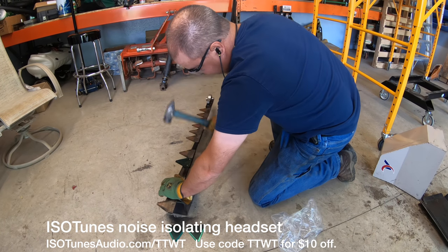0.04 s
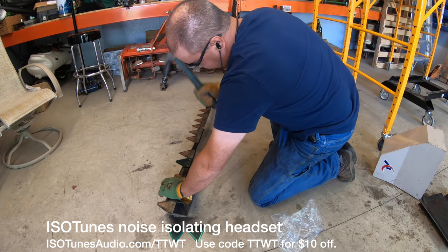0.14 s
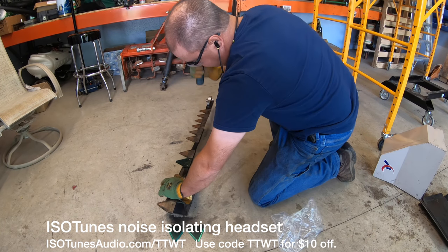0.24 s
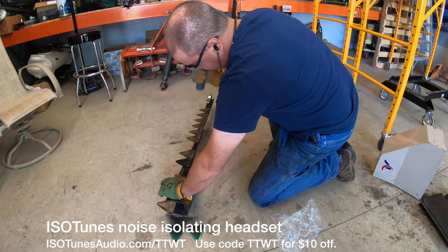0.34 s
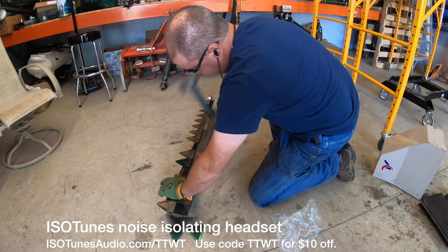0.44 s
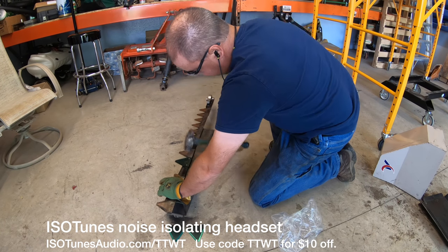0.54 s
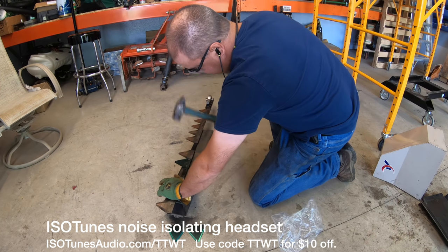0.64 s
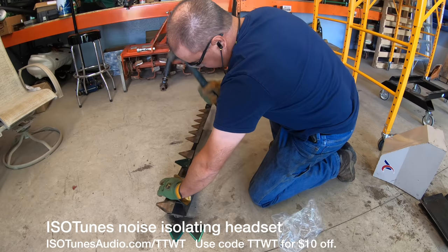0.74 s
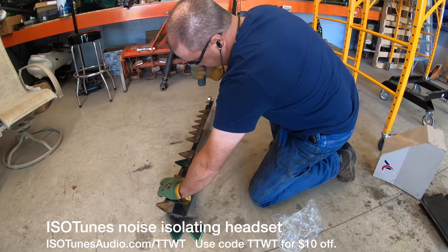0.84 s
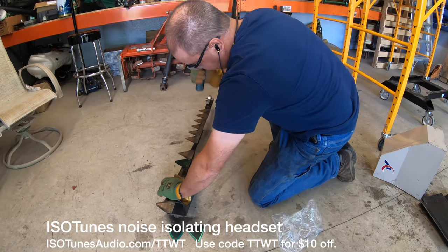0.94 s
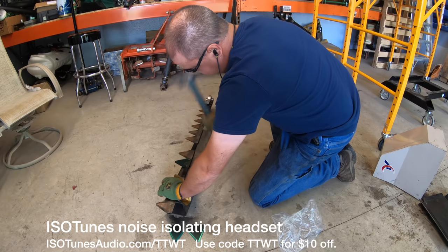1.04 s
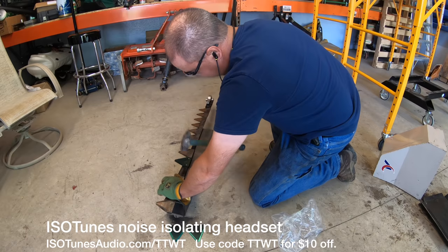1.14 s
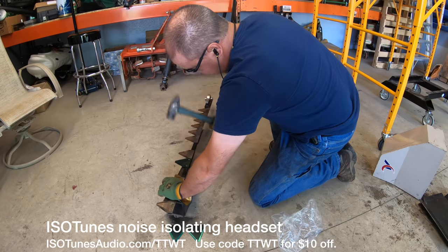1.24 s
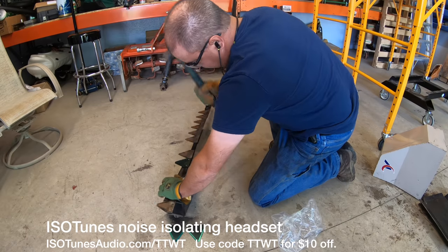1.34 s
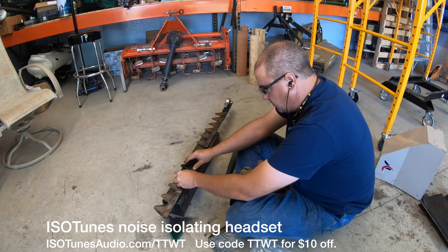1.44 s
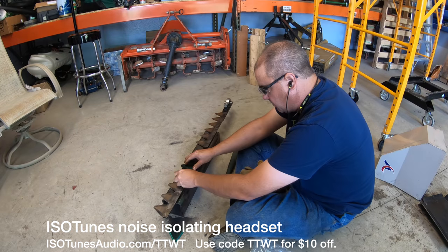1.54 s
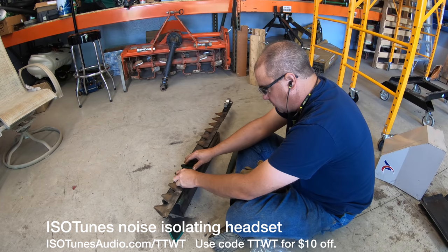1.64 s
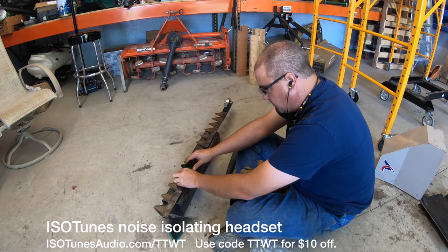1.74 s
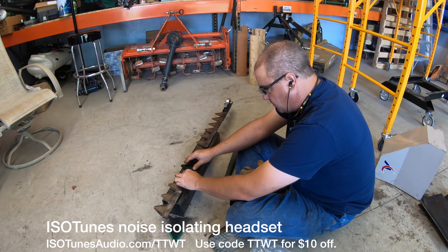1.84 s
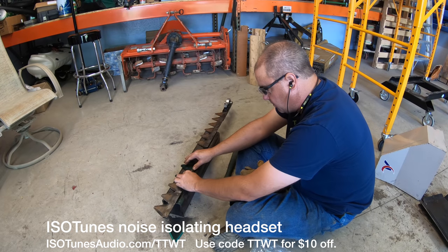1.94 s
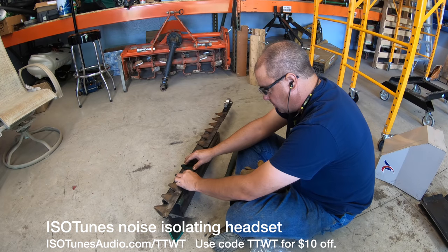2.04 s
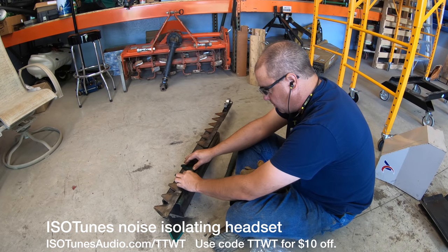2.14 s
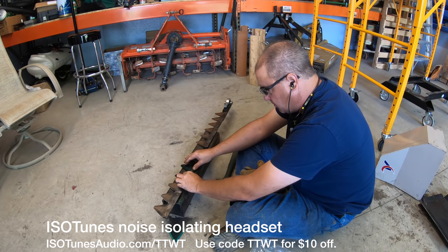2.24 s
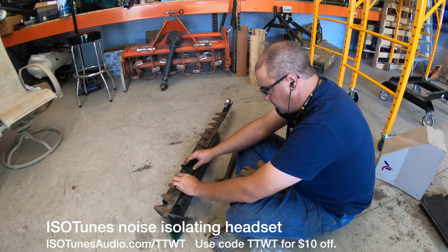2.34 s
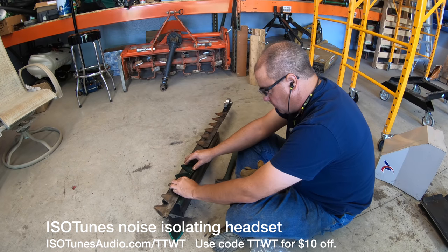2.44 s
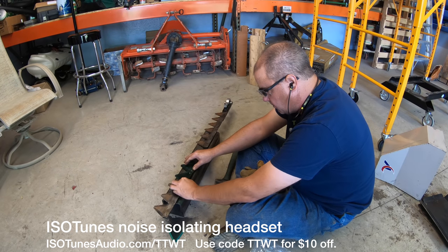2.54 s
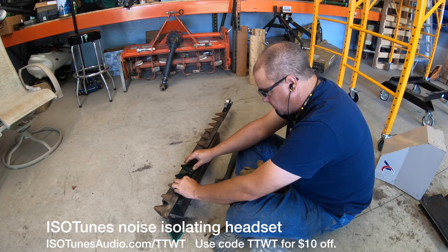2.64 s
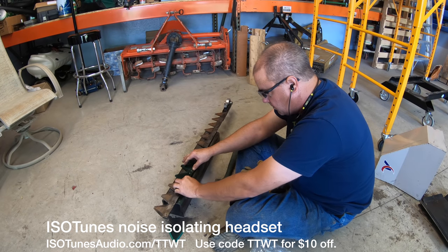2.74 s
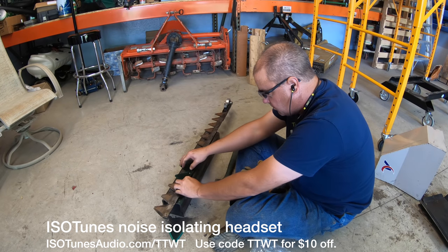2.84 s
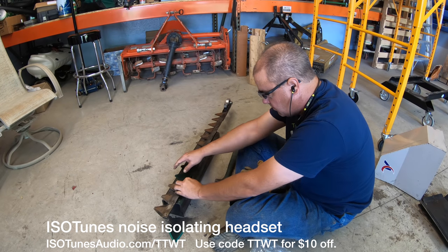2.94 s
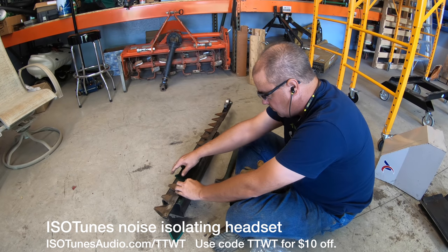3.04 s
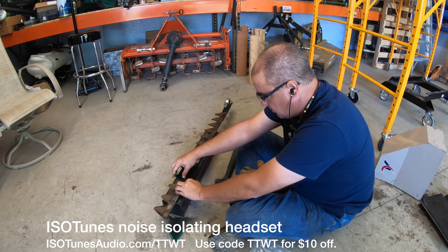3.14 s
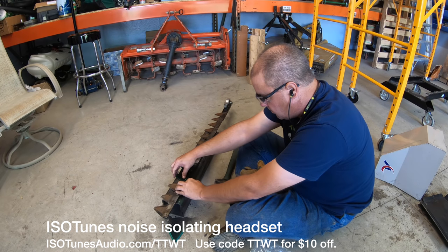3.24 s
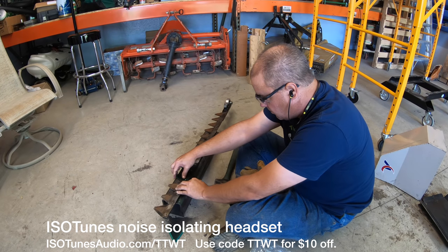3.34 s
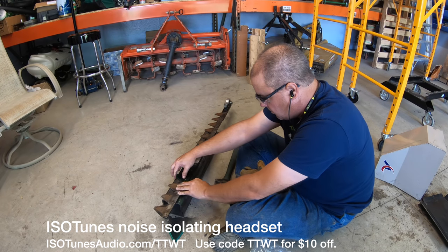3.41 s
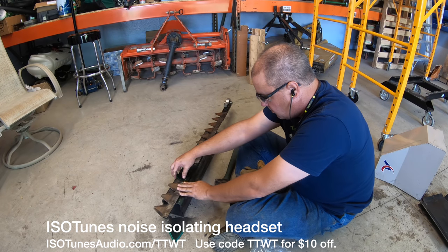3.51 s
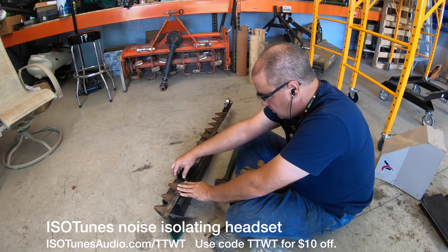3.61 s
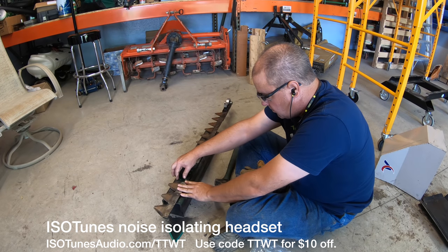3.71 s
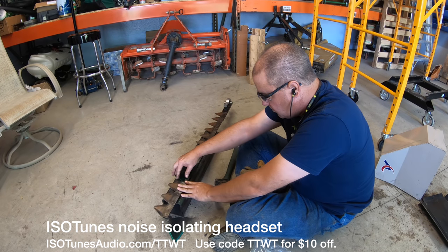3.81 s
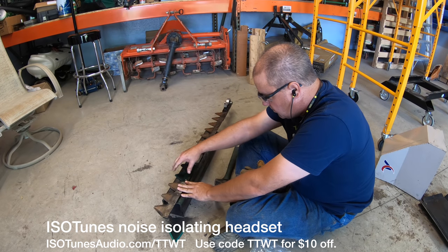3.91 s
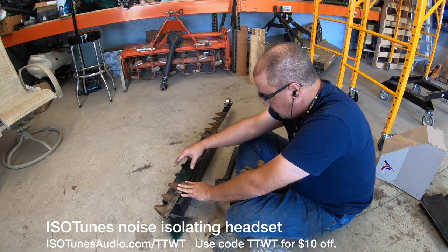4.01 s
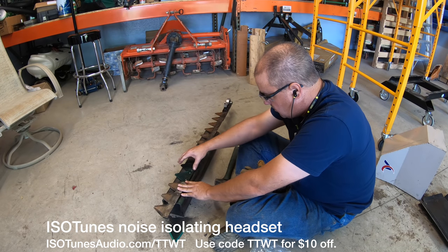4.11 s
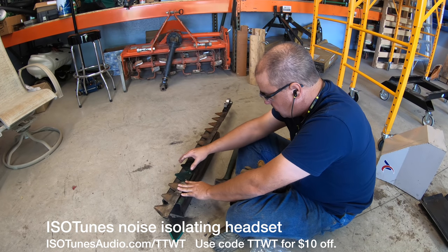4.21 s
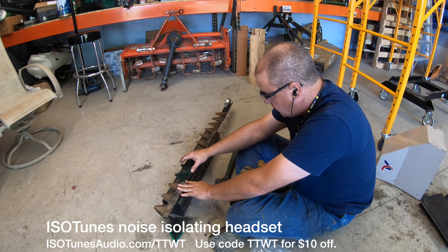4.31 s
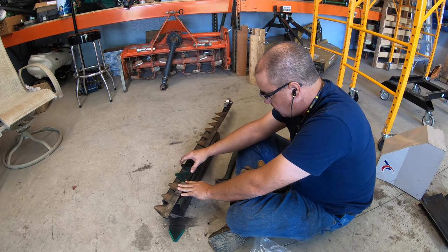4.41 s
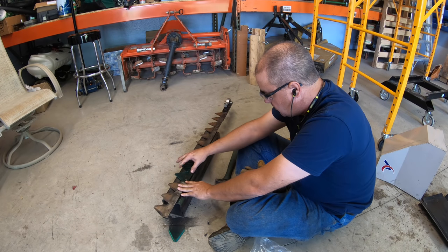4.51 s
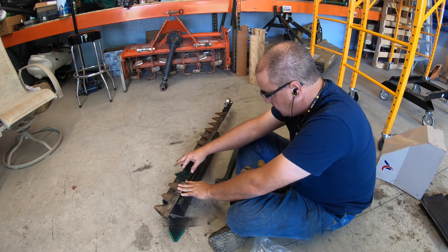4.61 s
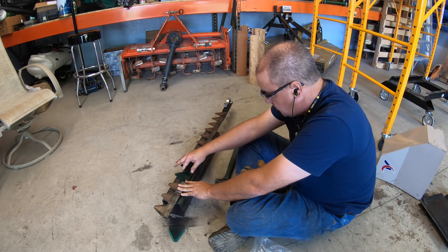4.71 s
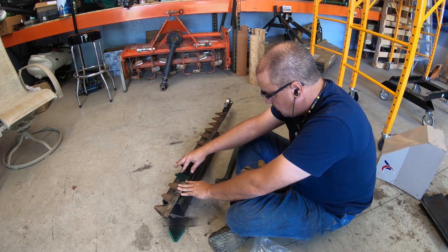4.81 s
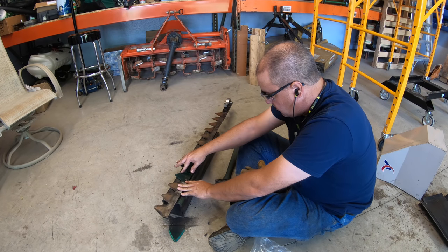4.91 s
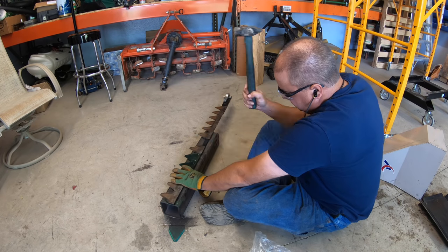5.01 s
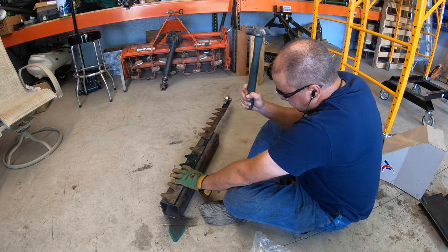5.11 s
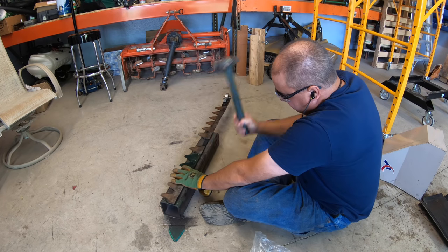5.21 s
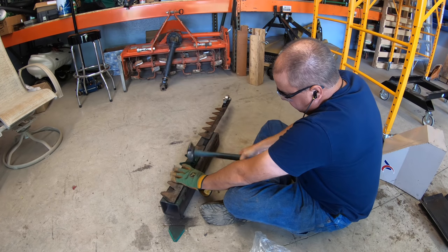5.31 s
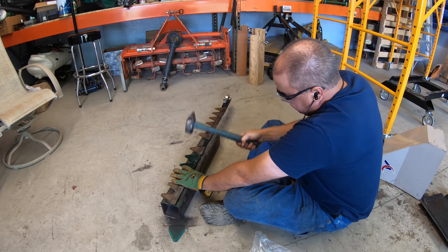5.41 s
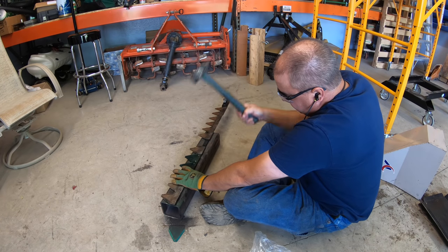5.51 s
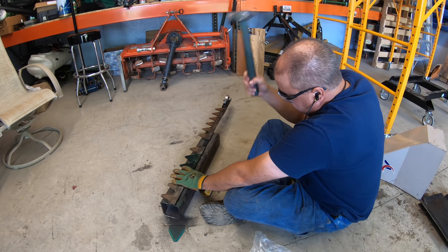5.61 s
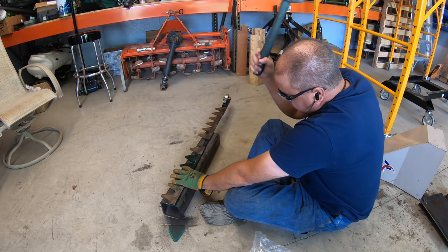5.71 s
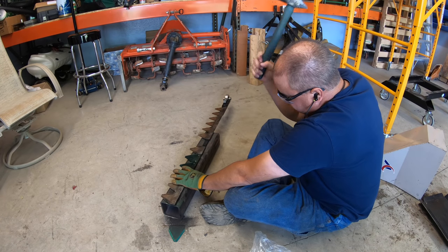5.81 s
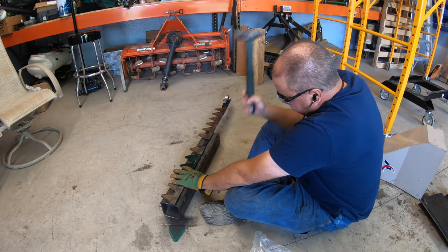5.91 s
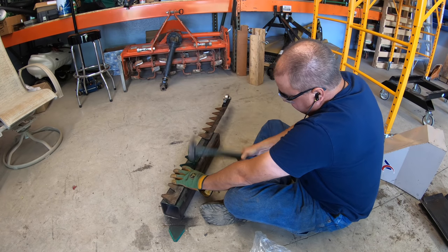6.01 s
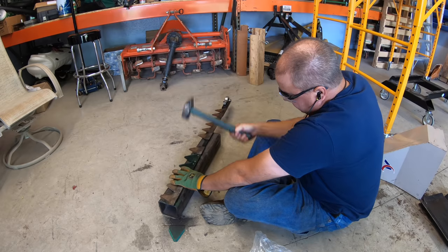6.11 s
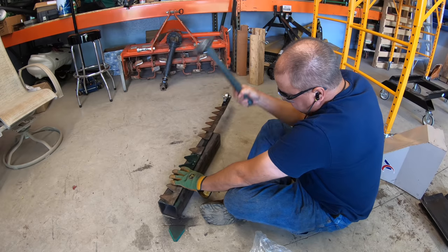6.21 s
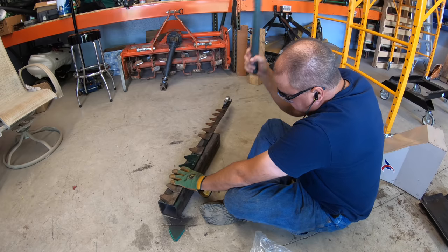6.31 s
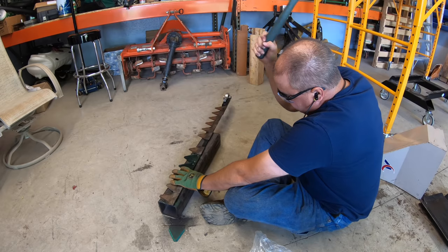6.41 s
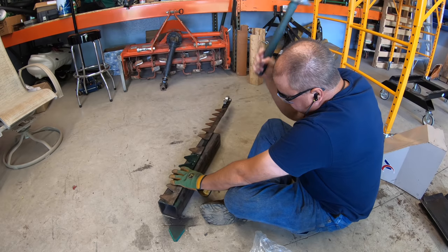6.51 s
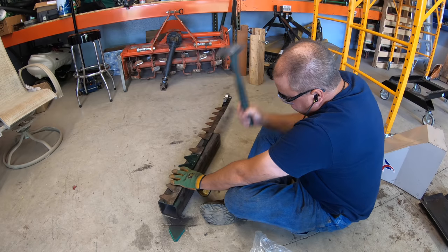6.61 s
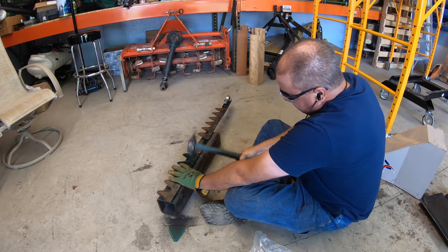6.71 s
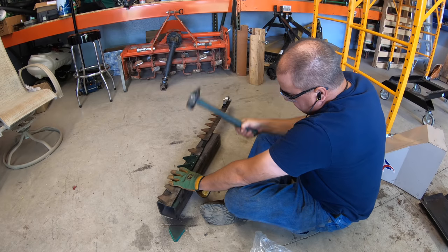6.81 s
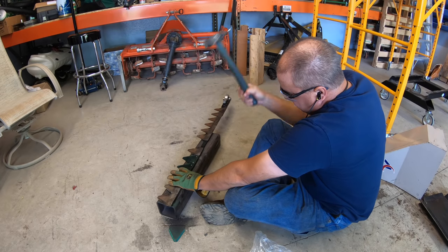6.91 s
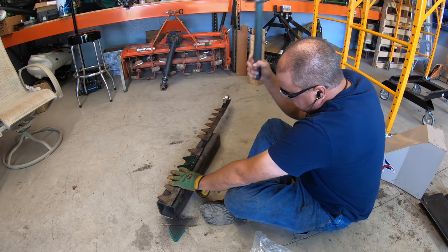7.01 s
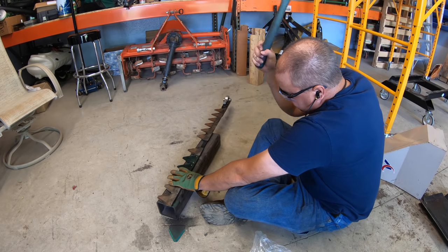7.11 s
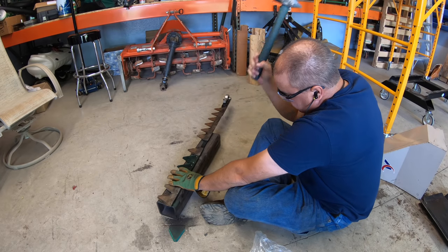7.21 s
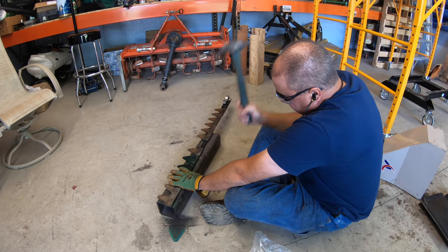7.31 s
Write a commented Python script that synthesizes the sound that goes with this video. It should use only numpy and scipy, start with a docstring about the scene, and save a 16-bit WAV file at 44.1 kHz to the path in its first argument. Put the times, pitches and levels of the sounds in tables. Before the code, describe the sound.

Heavy hammering on steel opens abruptly, each blow clanging with a shimmering inharmonic tail of about half a second and a dull thud beneath. The level drops and the hammering stops; loose metal sections clink and scrape in a brief cluster, then a few tiny taps. Hammering returns slightly slower, with dull ticks between hits. Faint workshop air noise, mostly centered pickup, loud peaks compressed and briefly ducked.

```python
"""Riveting a steel mower knife

A hammer drives rivets into a knife bar lying on a beam in a large concrete workshop: ringing modes, noisy clatter,
low thud. Between two rounds, loose knife sections clink on the bar as groups of modes with scrapes and knocks.
Dull ticks are scrape, knock and one short tone. Background noise is duller in the hammering rounds, brighter between.
The level dips to silence at heavy blows and at two other moments, then comes back; a gain control tames loud sound."""
import sys
import numpy as np
from scipy import signal
from scipy.fft import rfft, irfft, next_fast_len
from scipy.io import wavfile
from scipy.ndimage import uniform_filter1d

SR = 44100
rng = np.random.default_rng(int(sys.argv[2]) if len(sys.argv) > 2 else 0)


def wav_record(signal):
    """Record a signal, one row per channel, as 16-bit PCM in the file named by sys.argv[1]."""
    frames = np.transpose(np.atleast_2d(signal))
    bounded = np.clip(frames, -1, 1)
    # unit amplitude maps onto the largest positive 16-bit level
    quanta = np.round(bounded * 32767).astype(np.int16)
    wavfile.write(sys.argv[1], SR, quanta)


N = 324135  # length [samples]
LEAD = SR // 10  # room for a blow that strikes just before the start [samples]
SPAN = np.arange(SR) / SR  # clock of one sound [s]


def amp(db):
    """Turns decibels into a plain multiplier."""
    return 10 ** (np.asarray(db) / 20)


def along(points, hz):
    """Reads a curve of (frequency [Hz], value) points on a log frequency axis."""
    f, v = np.transpose(points)
    return np.interp(np.log(hz + 1), np.log(f + 1), v)


def filtered(x, response):
    """Multiplies the spectrum of x by a response that depends on frequency."""
    m = next_fast_len(x.shape[-1] + SR // 4)
    spectrum = rfft(x, m) * response(np.fft.rfftfreq(m, 1 / SR))
    return irfft(spectrum, m)[..., :x.shape[-1]]


def octaves(hz):
    """Distance from about 2 kHz in octaves; the added 20 Hz keeps the bottom finite."""
    return np.log2((hz + 20) / 2000)


def burst(spectrum, decays, tilt_db=0, spiky_db=0):
    """One second of noise starting near rms 1, each frequency dying at its own speed.
    Spiky noise crowds into many small modes."""
    hz, t, z = signal.stft(rng.standard_normal(SR), SR, nperseg=512)
    colour = amp(along(spectrum, hz) + tilt_db * octaves(hz))
    colour = colour / np.sqrt(np.mean(colour ** 2))
    fading = amp(-60 * t / along(decays, hz)[:, None])
    noise = signal.istft(z * fading * colour[:, None], SR, nperseg=512)[1][:SR]
    grid = np.arange(0, SR / 2, 45)
    lines = amp(spiky_db * np.clip(grid / 2500, 0, 1) * rng.standard_normal(len(grid)))
    lines = lines / np.sqrt(np.mean(lines ** 2))
    return filtered(noise, lambda f: np.interp(f, grid, lines))


def ringing(hz, db, t60, scatter_db, waver, waver_hz, tail_db):
    """Modes at new strengths; loose contacts and room echoes make each one waver in size and phase."""
    level, phase = rng.standard_normal((2, len(hz), 1))
    # random points, waver_hz of them each second, joined by straight lines
    knots = rng.standard_normal((2, len(hz), 200))
    place = np.minimum(SPAN * waver_hz, 198)
    left = place.astype(int)
    wander = knots[..., left] * (1 + left - place) + knots[..., left + 1] * (place - left)
    in_step, out_of_step = waver * np.minimum(0.48 + SPAN / 0.036, 1) * wander
    angle = 2 * np.pi * (hz[:, None] * SPAN + phase)
    # a quick first fall, then a faint slower tail, weaker in the treble
    fall_db = 60 * SPAN / t60[:, None]
    fade = amp(-1.12 * fall_db) + amp(tail_db - 3 * octaves(hz)[:, None] - 0.5 * fall_db)
    size = amp(db[:, None] + scatter_db * level) * fade
    return np.sum(size * ((1 + in_step) * np.sin(angle) + out_of_step * np.cos(angle)), axis=0)


def add(track, s, sound):
    """Mixes a sound in at s seconds."""
    track[LEAD + round(s * SR):][:SR] += sound


# Heavy blows: (time [s], ring level [dB], clatter level [dB], thud level [dB])
BLOWS = [(-.035, -3.5, -11, -16.5), (.547, -1.5, -10, -20), (1.154, -2.5, -10, -17.5),
         (4.662, -10.5, -5.5, -24.5), (5.354, -4, -12.5, -23), (6.071, -3, -10, -21.5),
         (6.746, -4.5, -8, -18)]
# Modes of the struck steel, levels before each blow's ring level is added:
# (frequency [Hz], first-round level [dB], second-round level [dB], nominal decay time to -60 dB [s])
BEAM_MODES = [(912, -40, -35, 0.63), (1034, -24, -19, 0.63), (1445, -18, -16, 0.67), (1488, -24, -24, 0.63),
              (1523, -19, -20, 0.58), (1550, -16, -17, 0.61), (1588, -28, -20, 0.82),
              (1612, -29, -26, 0.76), (1677, -14, -14, 0.58), (1725, -24, -23, 0.64),
              (1752, -25, -28, 0.67), (1828, -23, -26, 0.66), (1857, -19, -29, 0.72),
              (2094, -18, -19, 0.56), (2129, -31, -23, 0.55), (2323, -32, -30, 0.63),
              (2409, -23, -29, 0.74), (2449, -29, -33, 0.79), (2506, -21, -20, 0.64),
              (2538, -32, -35, 0.84), (2616, -30, -23, 0.58), (2789, -25, -17, 0.48),
              (2939, -25, -20, 0.58), (3211, -28, -29, 0.55), (3262, -15, -16, 0.54),
              (3305, -23, -18, 0.56), (3338, -32, -29, 0.62), (3496, -29, -23, 0.62),
              (3615, -27, -19, 0.61), (3758, -18, -29, 0.53)]
# Modes of the knife, same columns:
# (frequency [Hz], first-round level [dB], second-round level [dB], nominal decay time to -60 dB [s])
KNIFE_MODES = [(4013, -30, -21, 0.6), (4137, -29, -33, 0.64), (4164, -28, -32, 0.57),
               (4277, -33, -28, 0.69), (4307, -29, -28, 0.67), (4358, -28, -26, 0.58),
               (4430, -28, -24, 0.6), (4471, -25, -24, 0.59), (4565, -23, -30, 0.56),
               (4611, -34, -34, 0.66), (4867, -28, -34, 0.56), (4990, -22, -26, 0.57),
               (5020, -28, -24, 0.52), (5044, -29, -32, 0.52), (5179, -36, -34, 0.6),
               (5550, -35, -36, 0.62), (5580, -34, -33, 0.59), (5626, -34, -32, 0.76),
               (5696, -32, -33, 0.63), (5822, -31, -26, 0.53), (5986, -32, -37, 0.58),
               (6037, -32, -37, 0.55), (6471, -27, -30, 0.54), (6511, -37, -35, 0.66),
               (7047, -33, -40, 0.63), (7768, -29, -32, 0.5), (9475, -49, -38, 0.59),
               (9940, -41, -47, 0.57), (11108, -38, -42, 0.47), (12088, -33, -43, 0.5)]
# More high modes of the struck steel, same columns:
# (frequency [Hz], first-round level [dB], second-round level [dB], nominal decay time to -60 dB [s])
HIGH_MODES = [(7000, -36.5, -32, 0.57), (8070, -23, -21, 0.46), (8740, -33, -40.5, 0.86),
              (8500, -30.5, -21.5, 0.5), (10540, -26, -30.5, .35), (12000, -47, -53.5, 1),
              (12400, -43.5, -39, 0.4), (13350, -42, -41, .35), (14600, -42, -72, .4)]
# Colour of the rattling knife: (frequency [Hz], relative level [dB per Hz])
CLATTER = [(150, -43), (250, -7.5), (607, -9), (938, -9), (1020, -13.5), (1330, -14), (1500, -7),
           (2200, -11.5), (2440, -10.5), (3060, -9.5), (3340, -9.5), (5440, -12), (8550, -11.5),
           (16000, -25.5)]
# How long the rattle lasts: (frequency [Hz], decay time to -60 dB [s])
CLATTER_T60 = [(250, 0.5), (740, 0.4), (1600, 0.85), (3000, 0.72), (6000, 0.5), (10000, 0.34), (15000, 0.3)]
# Colour of the shaken floor slab: (frequency [Hz], relative level [dB per Hz])
THUD = [(15, -60), (25, -21), (80, -12), (183, 5.5), (208, -1), (254, -3), (335, -14), (500, -7),
        (650, -34.5), (1100, -120)]


def hammer():
    """Each blow rings the bar, rattles the knife and shakes the slab, whose thud swells and then drops away."""
    track = np.zeros(LEAD + N + SR)
    swell = np.exp(-((SPAN - .055) / .055) ** 2) + amp(-22.5 - 60 * SPAN / .5)
    hz, first_db, second_db, t60 = np.transpose(BEAM_MODES + KNIFE_MODES + HIGH_MODES)
    (pause, *_), (resume, *_) = DIPS
    for s, ring_db, clatter_db, thud_db in BLOWS:
        strengths = ring_db + (first_db if s < pause else second_db)
        ring = ringing(hz, strengths, t60, scatter_db=2, waver=1.1, waver_hz=38, tail_db=-20)
        clatter = amp(clatter_db) * burst(CLATTER, CLATTER_T60, spiky_db=4)
        thud = amp(thud_db) * swell * burst(THUD, [(30, 1.6), (300, 2.5)])
        # no hammering is heard between the two long dips
        heard = (s + SPAN < pause) | (s + SPAN > resume)
        add(track, s, (ring + clatter + thud) * heard)
    return track[LEAD:LEAD + N]


# Colour of the workshop's background noise: (frequency [Hz], relative level [dB per Hz])
HALL = [(18, -58.5), (30, -29.5), (98, -8.5), (161, -8), (221, -2), (404, -6.5), (1130, -7), (1280, -10.5),
        (1390, -5), (2010, -14), (6900, -16.5), (12600, -25.5), (16000, -24.5)]
# Background noise level and brightness over time, duller in the hammering rounds, brighter between:
# (time [s], nominal level [dB], tilt that sets the blend [dB per octave])
BACKGROUND = [(0, -53.5, -6.5), (1.5, -54.5, -3), (1.552, -53, -1.5), (2.7, -56.5, 0.5), (3.5, -54, -1),
              (4, -61, -1), (5.088, -60, 1), (5.11, -56.5, -14), (7.35, -50.5, -6)]


def hall():
    """Workshop air noise whose level and colour change over time, duller during the hammering.
    It blends a bright version with a dull one short of treble and deep bass."""
    s, level_db, tilt_db = np.transpose(BACKGROUND)
    t = np.arange(N) / SR
    noise = rng.standard_normal(N)

    def coloured(tilt):
        """Tilts the noise above about 1 kHz and shifts everything below 90 Hz."""
        return filtered(noise, lambda hz: amp(
            along(HALL, hz) + tilt * (np.maximum(octaves(hz) + 1, 0) + 3 * (hz < 90))))

    flat, bright, dull = coloured(0), coloured(2), coloured(-4)
    share = np.clip((np.interp(t, s, tilt_db) + 4) / 6, 0, 1) ** 2
    blend = share * bright + (1 - share) * dull
    return amp(np.interp(t, s, level_db)) * blend / np.std(flat)


# Colour of steel scraping steel: (frequency [Hz], relative level [dB per Hz])
SCRAPE = [(200, -72), (700, -18), (1400, 4), (2500, 7.5), (4500, 0.5), (7000, -4), (11000, -16.5),
          (16000, -26)]
# How long a scrape lasts: (frequency [Hz], decay time to -60 dB [s])
SCRAPE_T60 = [(1000, 0.38), (3000, 0.6), (8000, 0.5), (15000, 0.39)]
# Colour of the knocked hollow beam: (frequency [Hz], relative level [dB per Hz])
KNOCK = [(40, -89.5), (110, -28.5), (180, -17), (290, -0.5), (500, -9), (1000, -24), (2000, -74.5)]


def contact(scrape_db, tilt_db, knock_db):
    """Steel scraping steel, sharpest at first touch, over a knock of the beam."""
    click = 1 + 2.7 * amp(-60 * SPAN / 0.033)
    scrape = amp(scrape_db) * click * burst(SCRAPE, SCRAPE_T60, tilt_db, spiky_db=7)
    knock = amp(knock_db) * burst(KNOCK, [(300, 0.46)])
    return scrape + knock


# Dull ticks and scuffs of tool or rivet on the bar: (time [s], scrape level [dB],
# scrape tilt [dB per octave], knock level [dB], rivet ring level [dB], rise time [s])
TICKS = [(0.415, -35, -5, -49.5, -55, .006), (1.575, -48.5, -13, -53, -74, 0.0057),
         (5.11, -64.5, -4, -47.5, -78, 0.065), (5.284, -48, -11.5, -51.5, -45, 0.0012),
         (6.688, -39, -6.5, -46, -41, 0.0019), (7.293, -44.5, -8.5, -57, -42.5, .0008)]


def ticks():
    """A tool or rivet touches the bar: scrape and knock with one short tone of the rivet."""
    track = np.zeros(LEAD + N + SR)
    rivet_hz, rivet_t60 = 2860, .05  # [Hz], [s]
    for s, *touch, rivet_db, rise in TICKS:
        rivet = amp(rivet_db - 60 * SPAN / rivet_t60) * np.sin(2 * np.pi * rivet_hz * SPAN)
        onset = np.minimum(SPAN / rise, 1)
        add(track, s, onset * (contact(*touch) + rivet))
    return track[LEAD:LEAD + N]


# Section clinks: (time [s], way of touching [name], ring level [dB], overtone boost [dB], scrape level [dB],
# hardness as scrape tilt [dB per octave], knock level [dB], rise time [s])
TAPS = [(1.594, "edge", -43, 1, -58, -2.5, -69, 0.0013), (1.679, "flat", -27, -1, -20.5, 5.5, -63.5, 0.031),
        (1.722, "flat", -23, -3, -25, 3, -45.5, 0.0067), (1.873, "edge", -20.5, -5, -28, 4.5, -43, 0.0011),
        (1.903, "flat", -24, -0.5, -21, -0.24, -42, 0.011),
        (2.281, "edge", -41.5, -5, -62, -5, -67, 0.0013),
        (2.304, "edge", -8.5, -10.5, -39.5, 2, -53.5, .021),
        (2.322, "edge", -25, -3, -38.5, -2.1, -55, 0.00104),
        (2.991, "corner", -35, -7, -35, 2.2, -39.5, 0.00057),
        (3.017, "corner", -44, 5.5, -32.5, -1.5, -43.5, 0.0031),
        (3.309, "tip", -39, -0.5, -52.5, -0.5, -59, 0.0016),
        (3.641, "tip", -40.5, -24, -56, -2.4, -60, 0.0018)]
# Modes of a loose knife section: (frequency [Hz], relative level [dB], nominal decay time to -60 dB [s])
SECTION = [(1077, -19, .4), (1549, -4, .3), (1653, 0, .32), (1954, -5, .25), (2138, -6, .25),
           (2310, -13, .28), (2412, 0, .37), (2480, -2, .45), (2530, 0, .36), (2630, 0, .3),
           (2855, -6, .35), (2950, -6, .25), (3330, -6, .28), (3600, -5, .38), (4027, -3, .32),
           (4345, -4, .28), (4495, -1, .4), (4587, 1, .45), (5029, -6, .22), (6060, -2, .38),
           (6126, -2, .4), (6210, 0, .32), (6510, -9, .3), (6950, -9, .25), (7827, -10, .3), (8355, -5, .3),
           (8520, 0, .29), (10860, -5, .26), (11200, -2, .33), (12210, -14, .18), (14180, -12, .2),
           (15050, -14, .2)]
# Ways a section meets the bar, by name: (ring levels of its modes near 1.6, 2.4, 2.5, 2.7, 4, 6
# and above 7.5 kHz [dB], extra snap level [dB], snap decay time on top of the ring's own [s])
WAYS = {"flat": ((-1.5, 0, -8.5, -12, -12, 1, -1.5), -10, 0.051),
        "edge": ((-31.5, -2.5, -14.5, -21.5, -25.5, -19.5, -28.5), -1.52, 0.071),
        "corner": ((-1, -2, -12, -17, -0.5, -2.5, -16), 9.2, 0.031),
        "tip": ((-41, -0.5, -1.5, -9, -16.5, -15, -29), 15.3, 0.034)}


def taps():
    """How a section is touched decides which of its modes sound; fingers damp the first snap quickly."""
    track = np.zeros(LEAD + N + SR)
    soft_lifts_low = 2.5  # dB gained by the lowest modes for each dB per octave of hardness lost
    hz, db, t60 = np.transpose(SECTION)
    register = np.searchsorted([2200, 2450, 2600, 3000, 5200, 7500], hz)  # mode group, 0 is lowest
    for s, way, ring_db, overtones_db, scrape_db, tilt_db, knock_db, rise in TAPS:
        families_db, snap_db, snap_t60 = WAYS[way]
        strengths = db + ring_db + np.array(families_db)[register]
        strengths = strengths + overtones_db * (register > 3)
        strengths = strengths - soft_lifts_low * tilt_db * (register == 0)
        ring = ringing(hz, strengths, t60, scatter_db=1.5, waver=.9, waver_hz=65, tail_db=-25)
        ring = ring * (1 + amp(snap_db - 60 * SPAN / snap_t60))
        onset = np.minimum(SPAN / rise, 1)
        add(track, s, onset * (ring + contact(scrape_db, tilt_db, knock_db)))
    return track[LEAD:LEAD + N]


# Strength of the left-right difference: (frequency [Hz], level under the middle [dB])
WIDE = [(60, -32), (300, -32), (600, -19.5), (1200, -65.5), (15000, -64.5)]


def scene():
    """All sources in the middle, plus a faint smeared copy that differs between left and right."""
    middle = hammer() + hall() + ticks() + taps()
    scatter = rng.standard_normal(SR // 50) / np.sqrt(SR // 50)
    smeared = signal.fftconvolve(middle, scatter)[:N]
    side = filtered(smeared, lambda hz: amp(along(WIDE, hz)))
    return np.array([middle + side, middle - side])


def dip(s, fall, rise):
    """The level sinks to silence at s and climbs back almost in a straight line; all times in seconds."""
    return np.interp(np.arange(N) / SR, [s - fall, s, s + rise], [1, 0, 1]) ** 1.095


# Two moments when the level dips to silence: (time [s], fall time [s], rise time [s])
DIPS = [(1.493, 0.0048, 0.082), (5.097, 0.0072, 0.058)]


def record(dry):
    """Brief level dips, a gain control that turns loud passages down, soft peak limiting and a treble limit."""
    loudness = np.sqrt(np.abs(uniform_filter1d(dry[0] ** 2, size=SR // 40)) + 1e-12)
    gain = (1 + (loudness / amp(-10)) ** 4) ** -.15
    for blow in BLOWS[:3] + BLOWS[4:]:  # only the tail of the fourth blow is heard
        gain = gain * dip(blow[0], fall=0.017, rise=0.026)
    for moment in DIPS:
        gain = gain * dip(*moment)
    held = dry * gain
    held = held / (1 + np.abs(held / .95) ** 6) ** (1 / 6)  # soft peak limit near .95
    return filtered(held, lambda hz: hz < 15850)  # treble limit [Hz]


dry = scene()
out = record(dry)
wav_record(out)
```